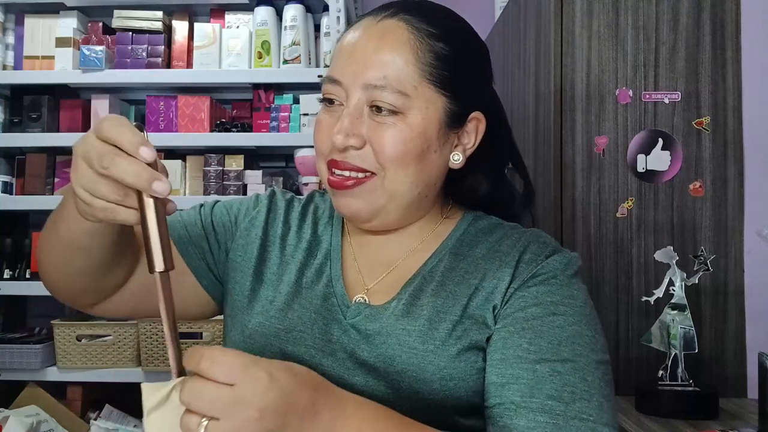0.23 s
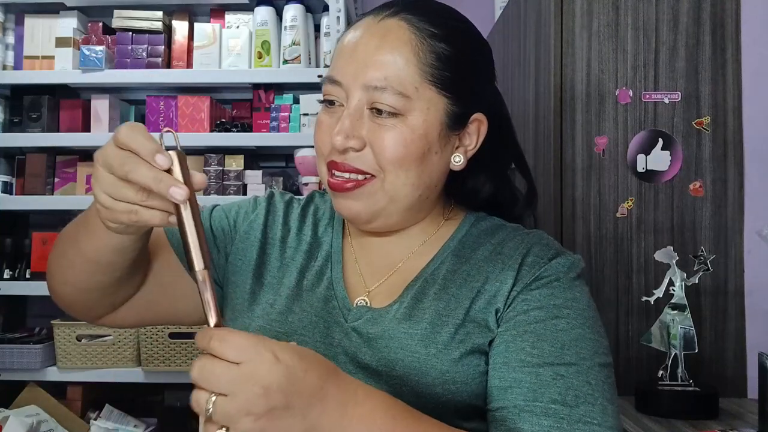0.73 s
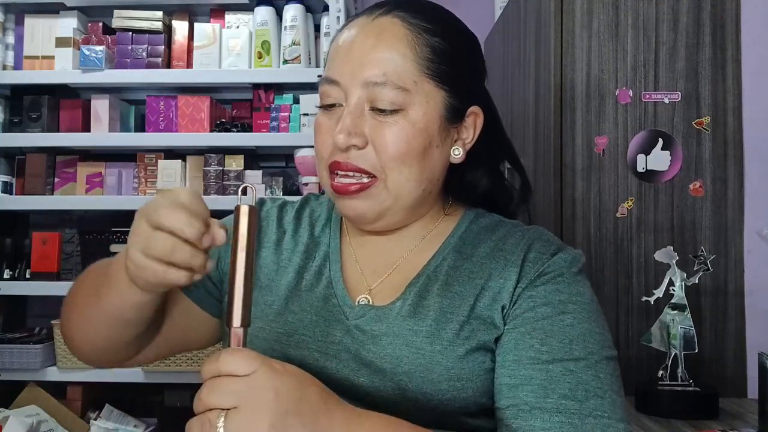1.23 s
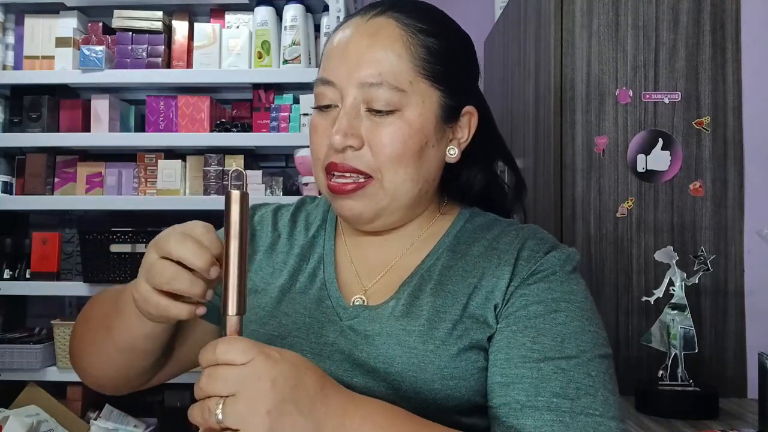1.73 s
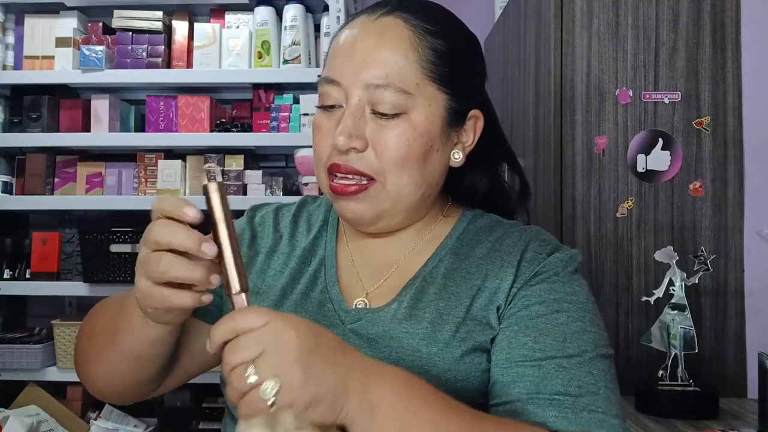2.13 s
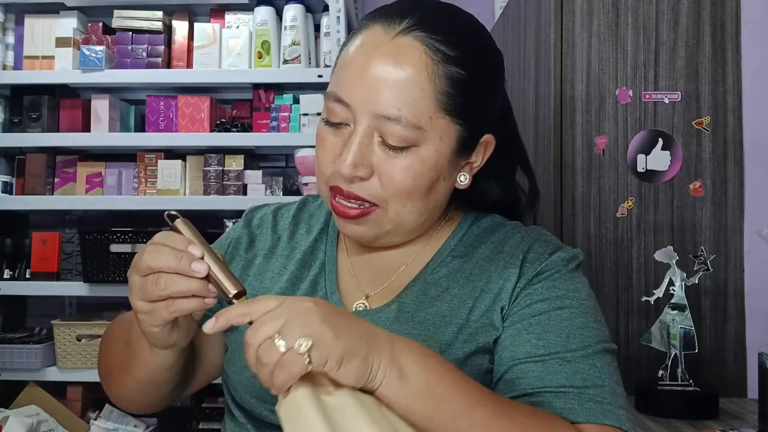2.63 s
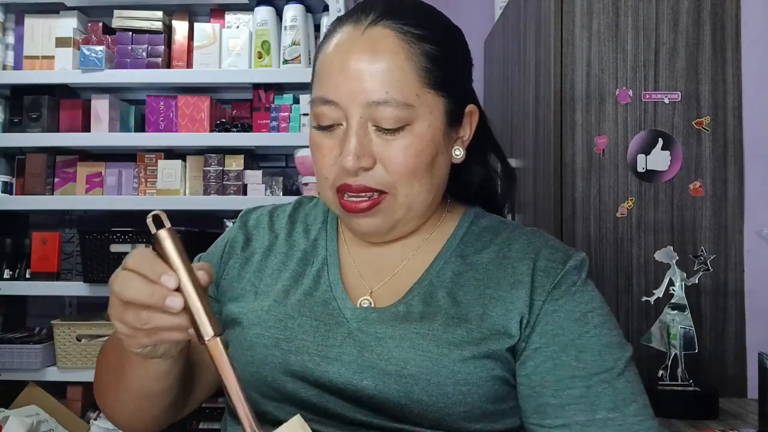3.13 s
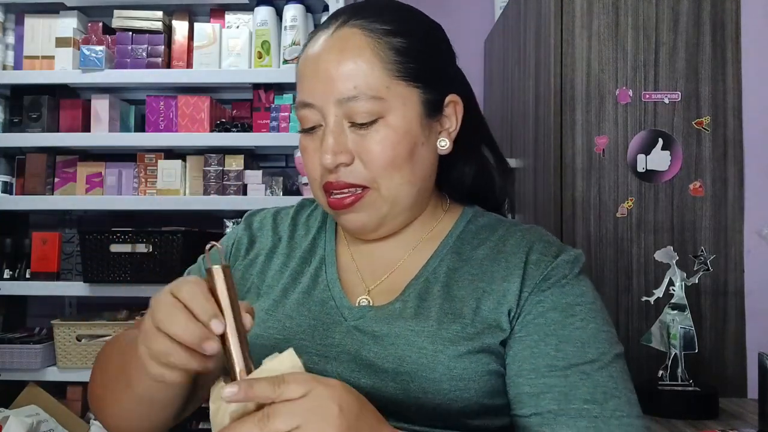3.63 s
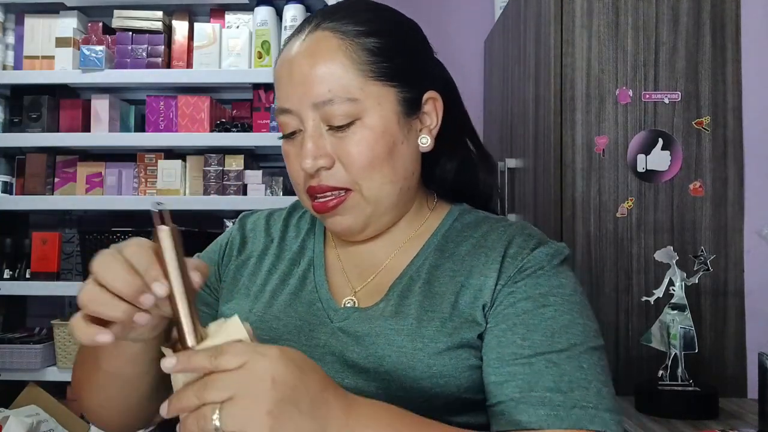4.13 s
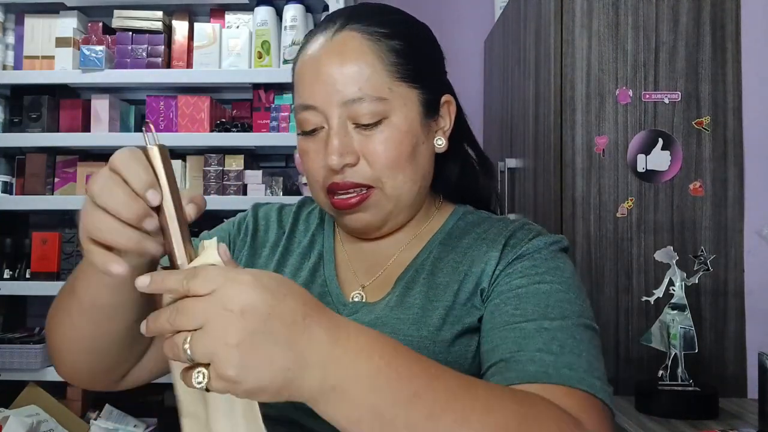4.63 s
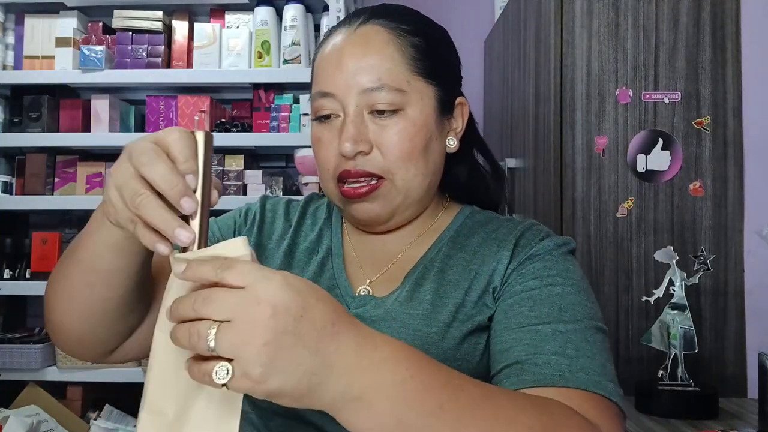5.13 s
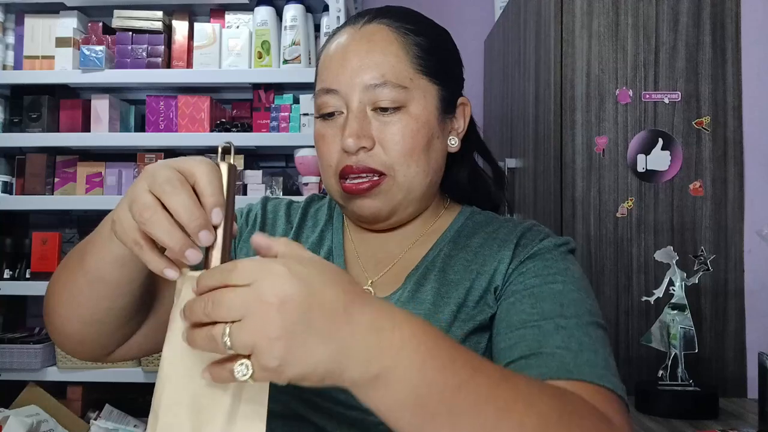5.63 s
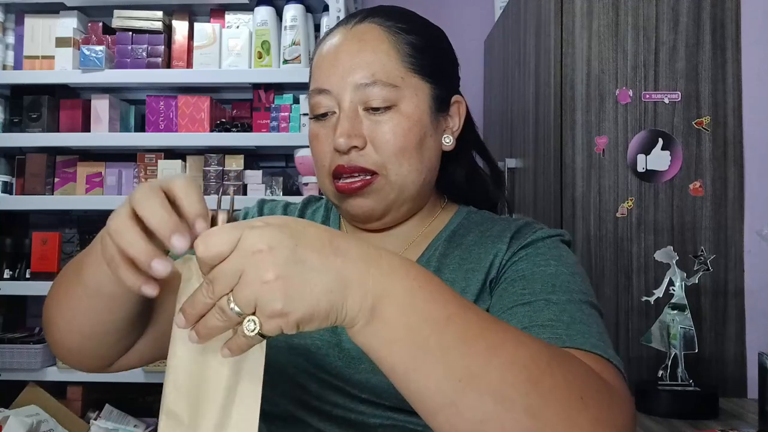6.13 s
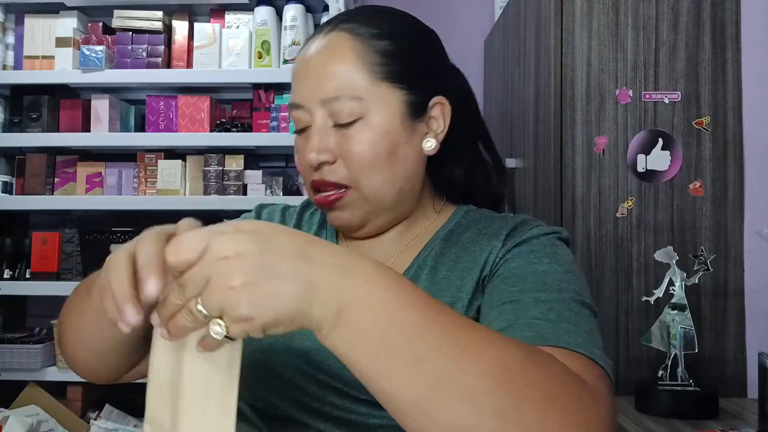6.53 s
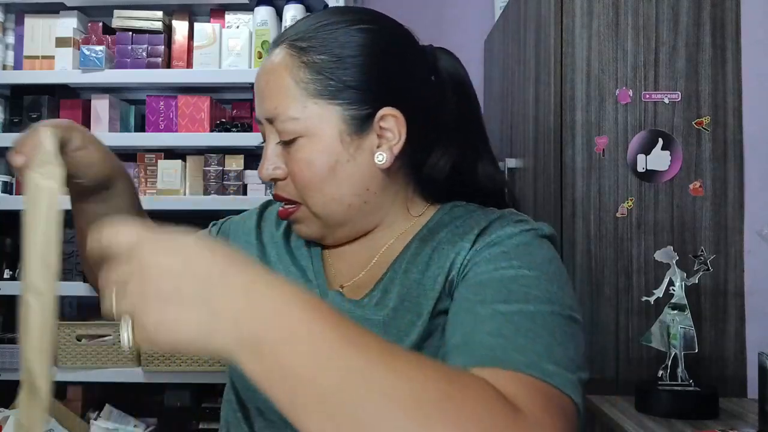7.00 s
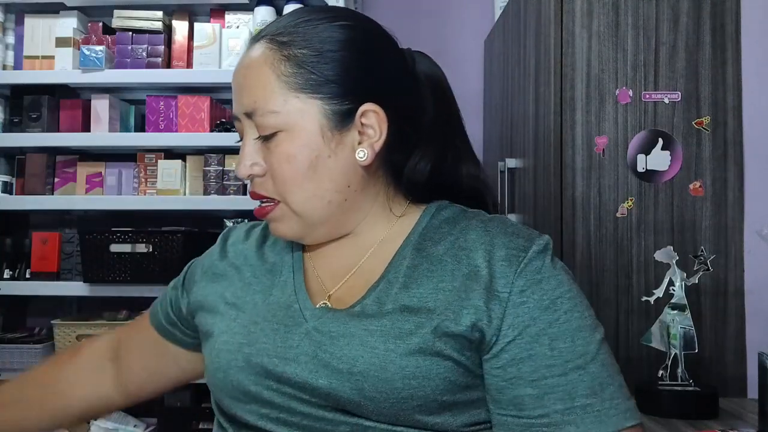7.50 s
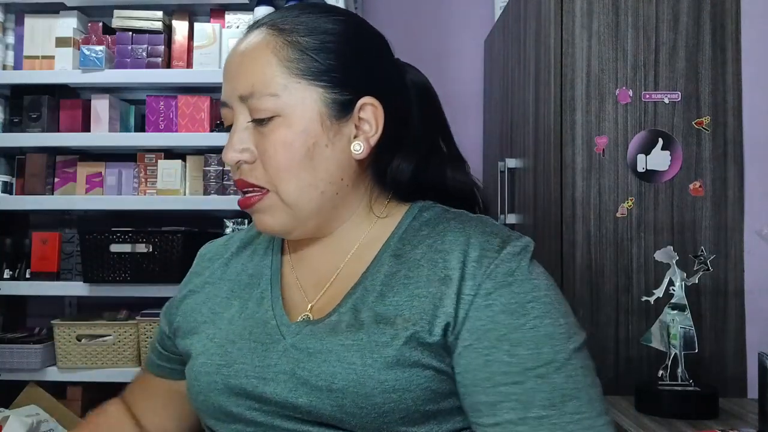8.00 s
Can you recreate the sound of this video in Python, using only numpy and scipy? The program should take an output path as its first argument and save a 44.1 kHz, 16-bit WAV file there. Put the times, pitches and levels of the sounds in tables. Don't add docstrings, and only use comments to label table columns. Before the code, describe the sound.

A kitchen tool slides into a stiff paper sleeve up close: sparse rustles, then busy crackling and sharp snaps, ending with soft table knocks.

```python
import sys
import numpy as np
from scipy import signal
from scipy.io import wavfile
from scipy.ndimage import uniform_filter1d

SR = 44100
rng = np.random.default_rng(int(sys.argv[2]) if len(sys.argv) > 2 else 0)


def dump_mix(stems):
    frames = np.atleast_2d(stems).T
    limited = np.clip(frames, -1, 1)
    pcm = np.round(limited * 32767).astype(np.int16)
    wavfile.write(sys.argv[1], SR, pcm)


def ratio(d):
    e = np.asarray(d, float) / 20
    return 10 ** e


N = 364266
CONTROL_STEP = 40

# pitch_hz, level_db (per Hz)
PAPER_COLOUR = [(35, -60.5), (60, -16.5), (233, -4.5), (354, -17.5), (458, -0.5), (715, -9), (1470, -5),
                (2770, 0), (3270, -2.5), (3670, -3), (8510, -7.5), (11500, -19), (16000, -8.5)]


def paper():
    # pitch_hz, likeness (0 to 1; below 0 counts as 0)
    port_likeness = [(60, -0.36), (180, 0.86), (550, 0.83), (1650, 0.3), (4970, -0.33), (15000, 0.57)]
    # pitch_hz, width_hz, level_db
    sleeve_panels = [(273, 35, 1.5), (466.5, 57, 0.5), (1550, 56, -1), (2620, 380, -12.5)]
    rub, bright, body, thud = handling()
    grain = crackle(200, spread_db=4.0, t60s=(.02, .015), smooth=1.3)
    sheet = 0
    for hz, mid, side in bands(*grain):
        if hz > 5500:
            shift_db = bright + 8.0
        elif hz > 2100:
            shift_db = 0
        elif hz > 1050:
            shift_db = -0.49 * (bright + 10)
        elif hz > 340:
            shift_db = body + 5.0
        else:
            shift_db = thud + 9.0
        flicker_db = 1.8 * drift(14)
        level_db = rub + shift_db + at_hz(PAPER_COLOUR, hz) + flicker_db
        sheet = sheet + ratio(level_db) * two_ports(mid, side, at_hz(port_likeness, hz))
    panels = 0
    for hz, width_hz, level_db in sleeve_panels:
        wander_db = 3.5 * drift(6.0)
        panels = panels + ratio(level_db + wander_db) * resonance(sheet, hz, width_hz)
    return ratio(13.5) * (sheet + panels) + ratio(rub - 2) * wrinkles()


def handling():
    # peak_s, rise_s, fall_s, rub_db, brightness_db
    along = [(0.171, 0.35, 0.24, -59.5, -7.5), (2.161, 0.06, 0.073, -48, -17.5),
             (2.909, 0.078, 0.065, -44, -8.5), (3.438, 0.4, 0.043, -63, -7), (3.58, 0.09, 0.06, -41, -13.5),
             (3.665, 0.06, 0.05, -33, -12.5), (3.763, 0.011, 0.026, -49.5, -40),
             (3.928, 0.043, 0.057, -45.5, -10.5), (4.078, 0.082, 0.074, -43, -11.5),
             (4.387, 0.13, 0.11, -50, -14), (4.475, 0.08, 0.12, -49, -11),
             (4.716, 0.048, 0.035, -41, -15.5), (5.385, 0.1, 0.053, -44, -10),
             (6.027, 0.1, 0.054, -41.5, -11.5), (6.303, 0.12, 0.07, -36.5, -8.5),
             (6.335, 0.017, 0.083, -23.5, -10), (6.642, 0.051, 0.022, -68.5, 2)]
    # peak_s, rise_s, fall_s, rub_db, brightness_db
    skimming = [(0.043, 0.072, 0.13, -41, -10), (0.362, 0.012, 0.054, -57.5, -20),
                (0.465, 0.014, 0.094, -59.5, -1.5), (0.733, 0.053, 0.17, -63, -15),
                (0.821, 0.055, 0.052, -54.5, -8), (0.944, 0.11, 0.15, -64.5, -5),
                (2.232, 0.2, 0.099, -56.5, -11), (2.369, 0.031, 0.083, -58, -29),
                (2.75, 0.064, 0.22, -56, -7.5), (2.99, 0.18, 0.073, -49, -6), (2.705, 0.025, 0.12, -65, -6),
                (2.865, 0.026, .1, -51, -7), (3.135, 0.074, 0.028, -40, -22.5),
                (3.224, 0.069, 0.056, -44, -9), (3.875, 0.043, 0.05, -44.5, -12.5),
                (4.994, 0.056, 0.014, -43, -9), (5.227, 0.034, 0.058, -48, -11),
                (6.76, 0.081, 0.14, -38, -11), (6.812, 0.033, 0.036, -39.5, -8)]
    # peak_s, rise_s, fall_s, rub_db, brightness_db
    pressing = [(0.587, 0.15, 0.081, -65.5, -14.5), (1.112, 0.098, 0.084, -53.5, -10.5),
                (1.614, 0.0063, 0.091, -59, -1.5), (4.24, 0.11, 0.06, -47, -10),
                (4.531, 0.022, 0.13, -42, -10.5), (4.806, 0.1, 0.088, -41, -12),
                (5.04, 0.046, 0.053, -41.5, -15.5), (5.12, 0.044, 0.074, -53.5, -16),
                (5.505, 0.21, 0.036, -48, -14), (5.6, 0.15, 0.11, -50, -9.5), (5.74, 0.14, 0.19, -75.5, 6),
                (5.868, 0.082, 0.054, -51, -12), (6.08, 0.08, 0.11, -42.5, -13),
                (6.457, 0.035, 0.069, -52, -18), (6.911, 0.091, 0.069, -40.5, -9)]
    # peak_s, rise_s, fall_s, rub_db, brightness_db
    swinging = [
        (7.023, 0.0097, 0.099, -57, -11),
        (5.4, 0.069, 0.083, -64, -6),
        (7.62, 0.043, 0.31, -59, -3.5),
        (7.37, 0.36, 0.38, -70.5, -7.5),
        (3.17, .05, .04, -55.5, -12),
    ]
    # peak_s, rise_s, fall_s, rub_db, brightness_db
    laying = [
        (7.684, 0.036, 0.09, -53, 1.5),
        (7.84, 0.034, .07, -52, -6),
        (7.975, .1, .04, -57.5, -2),
        (7.764, 0.071, 0.078, -37, -13),
        (7.914, 0.12, 0.09, -46.5, -12),
        (7.978, 0.064, 0.079, -50.5, -11.5),
    ]
    # strokes, sleeve body dB, hand thud dB
    grips = [(along, -0.46, -8.5), (skimming, -8.5, -15), (pressing, -2, -4.5), (swinging, -6, 1), (laying, -1.3, 6.5)]
    strokes = [(*row, body, thud) for rows, body, thud in grips for row in rows]
    s, rise, fall, db, *colours = np.transpose(strokes)[:, :, None]
    t = np.arange(0, N, CONTROL_STEP) / SR
    away = np.maximum((s - t) / np.clip(rise, .005, .35), (t - s) / np.maximum(fall, .005))
    power = ratio(2 * (db - 20 * away ** 1.4)) + 1e-14
    settle_db, settle_t60_s = -26.5, 0.36
    keep = ratio(-2 * 60 * CONTROL_STEP / SR / settle_t60_s)
    power = power + ratio(2 * settle_db) * signal.lfilter([2 * (1 - keep)], [1, -keep], power)
    total = power.sum(axis=0)
    rub = 10 * np.log10(total)
    bright, body, thud = ((power * colour).sum(axis=0) / total for colour in colours)
    firm_db, slap_db = -47.5, 12.5
    touch = np.clip(rub - firm_db, -30, 30)
    body = body - 0.176 * touch - np.maximum(touch - slap_db, 0)
    thud = thud - 0.2348 * touch
    rub, bright, body, thud = (np.interp(np.arange(N) / SR, t, line) for line in (rub, bright, body, thud))
    return rub, bright, body - 1.5 * drift(4.2), thud + 2 * drift(10.0)


def crackle(per_s, spread_db, t60s, smooth):
    born = rng.random(N) < per_s * ratio(6 * drift(9)) / SR
    sizes = ratio(spread_db * np.minimum(rng.exponential(1, N), 4.0))
    bursts = np.array([rms_one(dying(sizes * born, t60)) for t60 in t60s])
    bursts = bursts / np.sqrt(uniform_filter1d(bursts ** 2, size=2000) + 0.32)
    return [rms_one(burst + smooth) for burst in bursts]


def wrinkles():
    per_s, ring_cycles, patches = 250, 36.0, 14
    born = np.flatnonzero(rng.random(N) < per_s / SR)
    sizes = ratio(3.4 * np.minimum(rng.exponential(1, N), 3.0)) * rng.choice([-1, 1], N)
    dealt, out = rng.integers(0, patches, N), np.zeros((2, N))
    for k, hz in enumerate(np.geomspace(1000, 5500, patches)):
        clicks = np.zeros(N)
        mine = born[dealt[born] == k]
        clicks[mine] = sizes[mine]
        rung = ratio(at_hz(PAPER_COLOUR, hz)) * ring(clicks, hz, ring_cycles / hz)
        out += [rung, np.roll(rung, k % 5)]
    return rms_one(out)


def creases():
    # start_s, peak_db, panel_hz, t60_s
    tearing = [(.035, -23.5, 2900, 0.12), (.1221, -26.5, 1610, 0.011), (1.1087, -28.5, 2450, 0.12),
               (1.607, -31.5, 2500, 0.082), (3.2133, -24.5, 4700, 0.06), (3.5126, -45, 1390, 0.041),
               (4.0502, -34, 1760, 0.1), (4.065, -25.5, 1580, 0.026), (4.9727, -35, 2800, 0.033),
               (5.3662, -29, 4400, 0.086), (6.2726, -27, 1590, 0.052), (6.299, -19.5, 1460, 0.033),
               (6.3824, -18, 2640, 0.063), (6.7133, -23, 2420, 0.068), (6.791, -26, 2750, 0.092),
               (6.8179, -38, 2620, 0.095), (7.2195, -38.5, 3790, 0.28), (7.6763, -27, 3725, 0.27)]
    # start_s, peak_db, panel_hz, t60_s
    snapping = [(.8074, -36.5, 2510, 0.09), (2.882, -28.5, 3640, 0.22), (2.9, -24.5, 2580, 0.13),
                (3.1212, -18, 1700, 0.033), (3.2275, -16, 2620, 0.013), (3.575, -17.5, 1990, 0.13),
                (3.5913, -12.5, 2970, 0.05), (3.6228, -23, 1610, 0.059), (3.6574, -28, 2900, 0.051),
                (3.8672, -25.5, 2700, 0.067), (4.017, -24.5, 2930, 0.13), (4.2248, -20.5, 1550, 0.081),
                (4.3567, -31.5, 1670, 0.037), (4.5238, -16.5, 2310, 0.045), (4.6917, -28, 1370, 0.061),
                (4.792, -23, 2370, 0.07), (4.8058, -15, 3800, 0.054), (4.8521, -29, 2560, 0.13),
                (4.995, -28, 2830, .046), (5.2168, -25, 3700, 0.067), (5.3815, -28, 2640, 0.022),
                (5.647, -28, 1370, 0.06), (5.8465, -31.5, 1270, 0.16), (6.0118, -24, 2700, 0.027),
                (6.084, -20.5, 2220, 0.075), (6.333, -6, 1820, 0.031), (6.8692, -26.5, 2270, 0.094),
                (6.9202, -18.5, 2530, 0.015), (7.0273, -25.5, 4810, 0.069), (7.7553, -21.5, 2620, 0.14)]
    # start_s, peak_db, panel_hz, t60_s
    popping = [(.3553, -33.5, 1550, 0.043), (.4594, -33, 4060, 0.2), (.7283, -35.5, 1670, 0.067),
               (2.1211, -30.5, 1910, .05), (2.158, -35, 1170, 0.029), (2.2441, -27.5, 1990, 0.031),
               (2.6733, -52, 2230, 0.055), (3.0616, -25, 1900, 0.046), (3.4185, -27, 3020, 0.038),
               (3.5244, -23, 2950, 0.2), (3.5377, -24, 1810, 0.076), (3.7713, -34, 1610, 0.028),
               (3.927, -19, 2790, 0.05), (4.1079, -17, 1550, 0.034), (4.1841, -22.5, 1800, 0.037),
               (4.3873, -31.5, 1450, 0.041), (4.4452, -29, 2440, 0.042), (4.5452, -20, 4670, 0.064),
               (4.6603, -36, 3560, 0.046), (4.7053, -20.5, 2830, 0.091), (5.0374, -28, 1270, 0.06),
               (5.1111, -29, 2640, 0.035), (5.238, -26, 1480, 0.019), (5.4251, -28, 1340, 0.063),
               (6.4478, -19, 2690, 0.081), (6.6936, -34, 2370, 0.15), (6.7508, -16, 3920, 0.24),
               (6.8993, -21, 4030, 0.22), (7.3781, -25, 4870, 0.25)]
    # start_s, peak_db, panel_hz, t60_s
    ticking = [(0.305, -45, 1540, 0.036), (0.604, -43.5, 2150, 0.037), (0.705, -50, 1420, 0.04),
               (0.8158, -35, 2480, 0.04), (0.9645, -43, 1780, 0.04), (1.0647, -52, 1790, 0.04),
               (1.186, -48, 2360, 0.045), (1.8906, -51, 4440, 0.063), (1.9504, -47, 4000, 0.05),
               (2.0848, -47, 1520, 0.04), (2.6984, -48, 1470, 0.04), (2.737, -40, 1680, 0.031),
               (2.8281, -52, 1620, 0.04), (2.856, -43, 2690, 0.036), (2.971, -36, 1570, 0.052),
               (2.9933, -38, 1710, 0.04), (3.1, -46, 1580, 0.035), (3.7512, -32.5, 1780, 0.028),
               (3.8277, -41, 1680, 0.11), (3.8513, -42.5, 2700, 0.057), (3.9746, -33.5, 2420, 0.049),
               (4.078, -19.5, 1550, 0.031), (4.256, -31, 2230, 0.029), (4.3372, -34.5, 1440, 0.048),
               (4.4215, -38, 2360, 0.04), (4.7752, -27, 2300, 0.04), (4.8174, -24, 2470, 0.028),
               (5.1429, -49, 1400, 0.04), (5.311, -35.5, 1170, 0.044), (5.5156, -45, 2360, 0.037),
               (5.5673, -35, 2660, 0.047), (5.5787, -37, 3500, 0.04), (5.8052, -40, 2150, 0.05),
               (5.8717, -41, 2690, 0.04), (5.9846, -41, 1770, 0.04), (6.0653, -41, 2090, 0.04),
               (6.108, -33, 1780, 0.036), (6.1412, -34, 2860, 0.037), (6.221, -27.5, 3030, 0.04),
               (6.2413, -35, 3000, 0.04), (7.6086, -40, 4270, 0.046)]
    # start_s, peak_db, panel_hz, t60_s
    flicking = [(.029, -23, 2650, .02), (.205, -42, 1300, 0.027), (.572, -50, 3000, .03),
                (2.408, -53, 3500, .03), (2.437, -55, 3000, .03), (2.921, -35, 2410, 0.034),
                (3.2939, -41, 2920, 0.034), (3.3428, -45, 2730, .06), (3.5044, -30, 1430, .04),
                (3.641, -23, 2700, .04), (3.682, -24, 1980, .03), (4.4777, -35, 1360, .04),
                (4.5929, -31, 2860, .04), (5.472, -41, 1500, 0.033), (5.499, -37, 2400, .03),
                (5.9703, -35, 2800, .04), (6.6248, -48, 2240, 0.056), (6.763, -31, 2620, .025),
                (7.899, -40, 5020, .08), (.0385, -22, 2900, .02), (3.2145, -32, 700, .03)]
    # events, treble dB, sleeve body dB
    kinds = [(tearing, -11, -23.5), (snapping, -18.5, -15), (popping, -32, -27), (ticking, -31, -17),
             (flicking, -22, -18)]
    return [(s, db, hz, t60, treble_db, body_db - 0.1067 * (db + 29.5))
            for rows, treble_db, body_db in kinds for s, db, hz, t60 in rows]


def dip_before_snaps():
    marks = np.zeros(N)
    marks[[round(row[0] * SR) for row in creases()]] = 1
    return np.minimum(dying(marks[::-1], 0.084)[::-1], 1)


def snaps():
    length, panel_cycles = 6000, 26.0
    out, n = np.zeros((2, N + length)), np.arange(length)
    ranges_hz = ([1150, 7000], [5500, 18000], [400, 1100])
    broad, treble, sleeve = (signal.butter(3, hz, "band", fs=SR, output="sos") for hz in ranges_hz)
    for s, peak_db, hz, t60, treble_db, body_db in creases():
        fading = ratio(-60 * n / SR / np.clip(t60, .008, .2))
        weaker = (rng.random(length) < 400 / SR) * rng.random(length) * .5
        jerks = dying(weaker + 2.4 * (n == 0), .018) + .27
        burst = rng.standard_normal((2, length)) * jerks * fading
        sharp = burst * np.sqrt(jerks)
        crack = rms_one(ring(burst, hz, panel_cycles / hz)) + rms_one(signal.sosfilt(broad, sharp))
        parts = crack, signal.sosfilt(treble, sharp), signal.sosfilt(sleeve, burst)
        levels_db = 0, treble_db + 9.0, body_db - 0.5
        for part, db, alike in zip(parts, levels_db, (.85, .35, .75)):
            heard = two_ports(*(part / np.abs(part).max()), alike)
            out[:, round(s * SR):][:, :length] += ratio(peak_db + db) * heard
    return out[:, :N]


def slides():
    # start_s, length_s, level_db, panel_hz, width_hz
    edge_slides = [(0.194, 0.046, -61, 1520, 300), (0.295, 0.039, -55.5, 1500, 870),
                   (0.52, 0.092, -69, 1800, 900), (1.607, 0.13, -64.5, 3900, 2600),
                   (1.8915, 0.15, -60.5, 4150, 1000), (2.7, 0.22, -75, 1340, 2500),
                   (1.64, 0.072, -60, 480, 810), (1.89, 0.023, -65, 9700, 11000),
                   (1.9, 0.14, -69, 6500, 2400), (1.896, 0.076, -70.5, 256, 59),
                   (2.301, .04, -66, 2450, 500), (2.676, 0.26, -63.5, 2300, 1100),
                   (2.695, 0.133, -55.5, 1580, 230), (4, 0.086, -53, 426, 150),
                   (5.92, 0.094, -56, 2600, 500), (7.125, 0.04, -71, 4850, 900),
                   (7.22, 0.025, -54, 4200, 5200), (7.312, 0.06, -57, 5300, 3300),
                   (7.378, 0.015, -50, 5500, 5000), (5.672, 0.16, -59, 2000, 6200),
                   (5.1, 0.055, -62, 2050, 1200), (6.973, 0.011, -45, 1230, 600),
                   (5.6, 0.027, -48, 1430, 220), (4.585, 0.015, -53, 3000, 1500),
                   (3.793, 0.075, -60, 1500, 2500), (4.5, 0.069, -59, 270, 80),
                   (0.88, 0.08, -67, 2200, 890), (5.11, 0.073, -55.5, 460, 170), (7.74, 0.3, -53, 364, 110),
                   (5.44, .12, -60, 480, 200)]
    attack_s, release_s, rough_db = 0.0013, 0.03, 2.5
    out = np.zeros((2, N + SR))
    t, uneven = np.arange(SR // 2) / SR, np.tile(drift(28), 2)
    for s, length, db, hz, width_hz in edge_slides:
        shape = np.clip(t / attack_s, 0, 1) * ratio(-20 * np.maximum(t - length, 0) / release_s)
        noise = rng.standard_normal((2, len(t)))
        sung = rms_one(resonance(resonance(noise, hz, width_hz), hz, width_hz))
        rough = ratio(rough_db * uneven[round(s * SR):][:len(t)])
        rough = rough / np.sqrt(np.mean(rough[:round(length * SR) + 1] ** 2))
        out[:, round(s * SR):][:, :len(t)] += ratio(db) * shape * rough * two_ports(*sung, 0.32)
    return out[:, :N]


def taps():
    # start_s, peak_db
    ring_taps = [
        (2.123, -32.5),
        (2.147, -41),
        (2.159, -24.5),
        (2.359, -27),
    ]
    # pitch_hz, level_db, t60_s
    handle_modes = [(887, -19, 0.12), (1370, -2, 0.052), (1610, 5.5, 0.024), (2640, 2, 0.013)]
    s, peak_db = np.transpose(ring_taps)
    contact = dying(clicks_at(s, peak_db - 24.5), 0.018) * rng.standard_normal(N)
    rings = sum(ratio(level_db) * ring(contact, hz, t60) for hz, level_db, t60 in handle_modes)
    return signal.sosfilt(signal.butter(2, [600, 3500], "band", fs=SR, output="sos"), rings)


def knocks():
    # start_s, peak_db, low_mode_db
    blows = [(0.07, -42.5, -25), (1.114, -58, -4), (1.635, -51, -36), (2.156, -43.5, -25),
             (2.901, -44.5, -23), (3.58, -38.5, -32), (3.678, -39, -7), (4.106, -39, -15), (4.221, -65, 15),
             (4.517, -41, -37), (4.798, -50.5, 3), (5.038, -43.5, -19), (5.419, -41.5, -17),
             (5.638, -50, -17), (6.079, -35, -26), (6.335, -22.5, -13.5), (6.399, -50, -26),
             (6.913, -49, -32), (7.726, -39.5, 0), (7.761, -23, -9.5), (7.827, -26.5, -11),
             (7.877, -34.5, -25), (7.911, -41, 1), (7.979, -27.5, -12.5), (8.02, -50.5, 11.5)]
    # pitch_hz, level_db, t60_s
    table_modes = [(61.6, -26, 0.18), (104.4, 1.5, 0.34), (143.4, 16, 0.091), (237, 2, 0.18),
                   (291.6, 2.5, 0.17), (460, -19.5, 0.11), (466.4, 7, 0.084), (493, -27.5, 0.091)]
    s, peak_db, low_db = np.transpose(blows)
    luck, out = rng.normal(0, 0.43, (len(s), len(table_modes))), 0
    for (hz, level_db, t60), luck_db in zip(table_modes, luck.T):
        struck_db = peak_db + level_db - 10.5 + luck_db + low_db * (hz < 200)
        out = out + ring(clicks_at(s, struck_db), hz, t60)
    return signal.sosfilt(signal.butter(3, [70, 900], "band", fs=SR, output="sos"), out)


def bumps():
    # start_s, peak_db
    nudges = [
        (1.1, -64),
        (1.68, -63),
        (2.86, -67),
        (5.63, -51),
        (6.38, -44),
    ]
    s, peak_db = np.transpose(nudges)
    swing = ring(clicks_at(s, peak_db + 1.0), 56, 0.21)
    return signal.sosfilt(signal.butter(2, 90, fs=SR, output="sos"), swing)


def drone():
    # time_s, pitch_hz, level_db, second_multiple_db
    stand_swing = [
        (6.8, 57.6, -79, -72),
        (7.026, 58.5, -43, -69),
        (7.278, 58.3, -41, -51),
        (7.536, 60.3, -54, -66),
        (7.808, 59.6, -33, -63.5),
        (7.954, 60.8, -42.5, -53),
        (8.02, 60.4, -38.5, -46),
        (8.154, 59, -50, -67),
        (8.26, 57.5, -61.5, -72),
    ]
    hz, first_db, second_db = in_time(stand_swing)
    third_db = second_db - 8
    phase = 2 * np.pi * np.cumsum(np.maximum(hz, 0)) / SR
    levels_db = [first_db, second_db, third_db]
    return sum(np.sqrt(2) * ratio(db) * np.sin((k + 1) * phase) for k, db in enumerate(levels_db))


def room(x):
    t60_s, wall_cut_hz = 0.1, 31000
    out, dull = np.zeros((2, N)), np.exp(-2 * np.pi * wall_cut_hz / SR)
    for k, lag in enumerate((rng.uniform(0.011, 0.034, 12) * SR).astype(int)):
        loop, gain, state = x.copy(), ratio(-60 * lag / SR / t60_s), [0.]
        for i in range(lag, N, lag):
            back, state = signal.lfilter([gain * (1 - dull)], [1, -dull], loop[i - lag:i], zi=state)
            loop[i:i + lag] += back[:N - i]
        out[k % 2] += (loop - x) * (-1) ** (k // 2)
    return out


def room_air():
    # pitch_hz, level_db
    air_colour = [(18, -62), (30, -39), (62, -6), (150, -16), (500, -10), (1100, -20), (2700, -24),
                  (3700, -34), (16000, -36)]
    # pitch_hz, likeness (0 to 1)
    air_likeness = [(60, 0.17), (380, 0.14), (2380, 0.21), (15000, 0.31)]
    air = 0
    for hz, mid, side in bands(1, 1):
        air = air + ratio(at_hz(air_colour, hz)) * two_ports(mid, side, at_hz(air_likeness, hz))
    return ratio(-71 + 1.2 * drift(5.0)) * rms_one(air)


def rms_one(x):
    return x / np.sqrt(np.mean(x ** 2) + 1e-20)


def in_time(rows, outside=-120):
    s, *columns = np.transpose(rows)
    return np.array([np.interp(np.arange(N) / SR, s, c, outside, outside) for c in columns])


def at_hz(points, hz):
    pitch_hz, value = np.transpose(points)
    return np.interp(np.log(hz), np.log(pitch_hz), value)


def drift(rate_hz):
    r = np.exp(-2 * np.pi * CONTROL_STEP * rate_hz / SR)
    noise = rng.standard_normal(N // CONTROL_STEP + 2002)
    slow = signal.lfilter([1], [1, -2 * r, r * r], noise)[2000:]
    return np.interp(np.arange(N) / CONTROL_STEP, np.arange(len(slow)), rms_one(slow))


def clicks_at(s, level_db):
    clicks = np.zeros(N)
    clicks[np.round(s * SR).astype(int)] = ratio(level_db)
    return clicks


def dying(clicks, t60):
    return signal.lfilter([1], [1, -ratio(-60 / (t60 * SR))], clicks + 1e-18)


def ring(x, hz, t60):
    r, w = ratio(-60 / (t60 * SR)), 2 * np.pi * hz / SR
    return signal.lfilter([0, np.sin(w)], [1, -2 * r * np.cos(w), r * r], x + 1e-18)


def resonance(x, hz, width_hz):
    r = np.exp(-np.pi * width_hz / SR)
    rise = np.array([1, 0, -1]) * (1 - r * r) / 2
    return signal.lfilter(rise, [1, -2 * r * np.cos(2 * np.pi * hz / SR), r * r], x)


def two_ports(mid, side, alike):
    alike = np.clip(alike, 0, 1)
    return np.sqrt(.5 + .5 * alike) * mid + np.sqrt(.5 - .5 * alike) * side * [[1], [-1]]


def bands(gate, treble_gate):
    edges_hz = 45 * 2 ** np.arange(0, 8.6, .5)
    white = rng.standard_normal((2, 2, N))
    for k, (low, high) in enumerate(zip(edges_hz, edges_hz[1:])):
        gated = white[k % 2] * (treble_gate if low > 3500 else gate)
        band = signal.butter(2, [low, high], "band", fs=SR, output="sos")
        yield np.sqrt(low * high), *signal.sosfilt(band, gated)


def scene():
    rustle = paper() * ratio(-8 * dip_before_snaps())
    cracks = taps() + snaps()
    parcel = (rustle + cracks + slides()) * ratio([[-.8], [.8]])
    parcel[0] = np.roll(parcel[0], 4)
    echoes = ratio(-15) * room(cracks.mean(axis=0))
    shaking = (knocks() + bumps() + drone()) * ratio([[-.4], [.4]])
    return parcel + echoes + shaking + room_air()


def top_cut(x):
    return signal.sosfilt(signal.butter(12, 16660, fs=SR, output="sos"), x)


def record(dry):
    cut = signal.sosfilt(signal.ellip(8, .5, 60, 15500, fs=SR, output="sos"), dry)
    cut = signal.sosfilt(signal.butter(2, 40, "high", fs=SR, output="sos"), cut)
    return top_cut(cut)


dry = scene()
out = record(dry)
dump_mix(out)
```